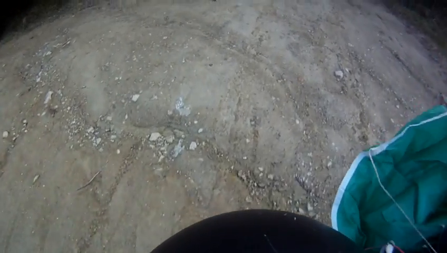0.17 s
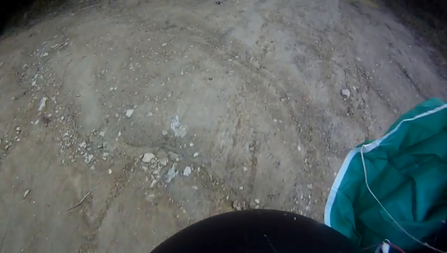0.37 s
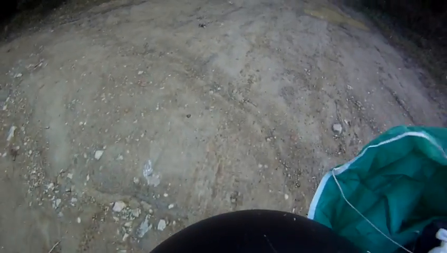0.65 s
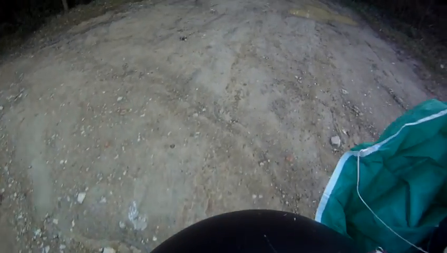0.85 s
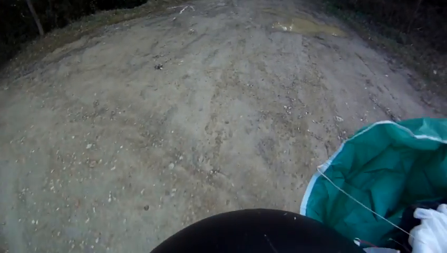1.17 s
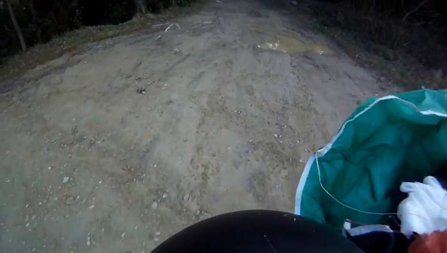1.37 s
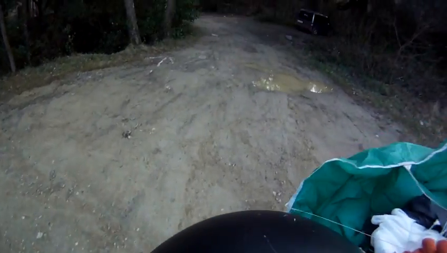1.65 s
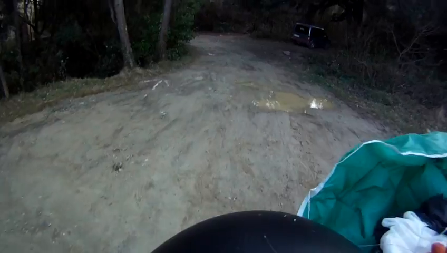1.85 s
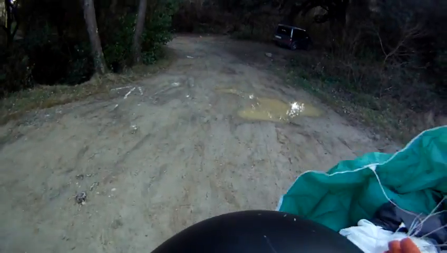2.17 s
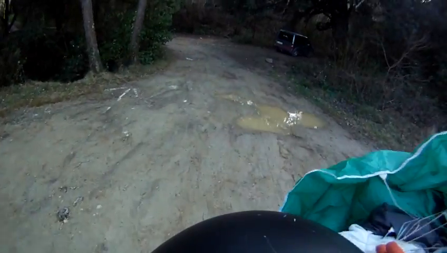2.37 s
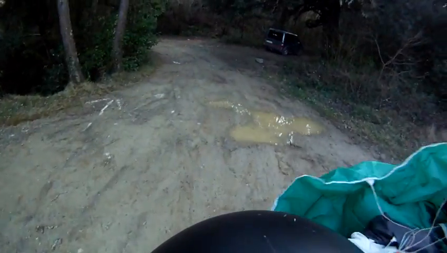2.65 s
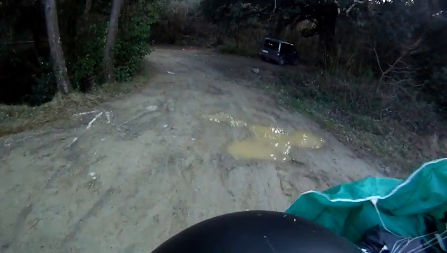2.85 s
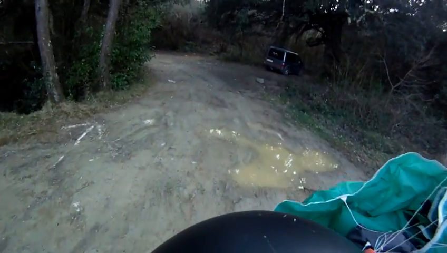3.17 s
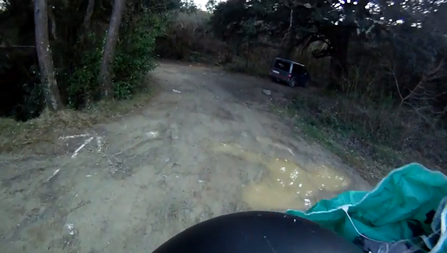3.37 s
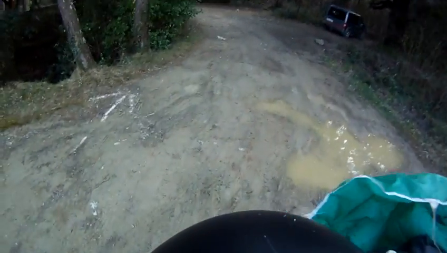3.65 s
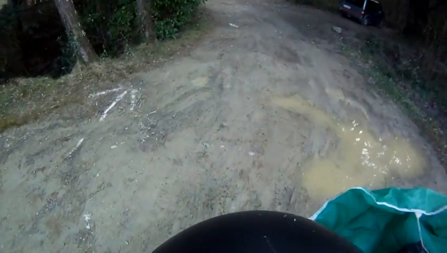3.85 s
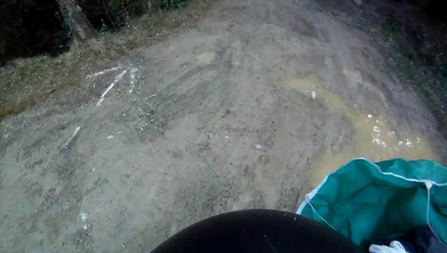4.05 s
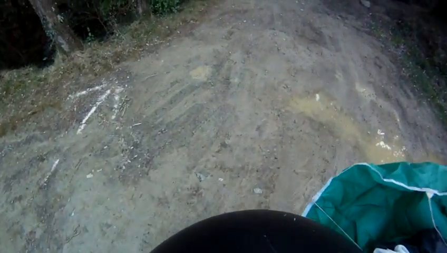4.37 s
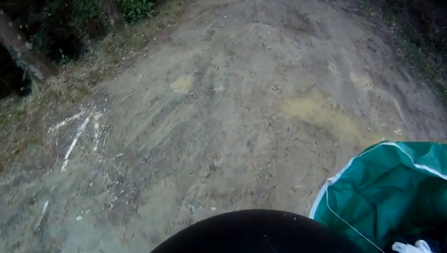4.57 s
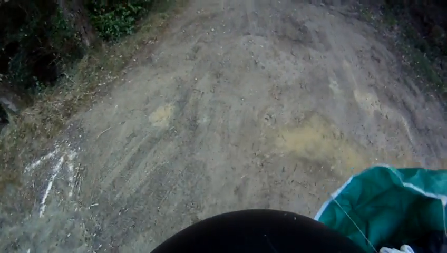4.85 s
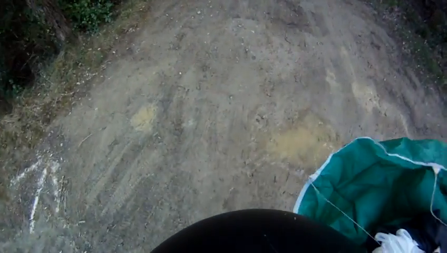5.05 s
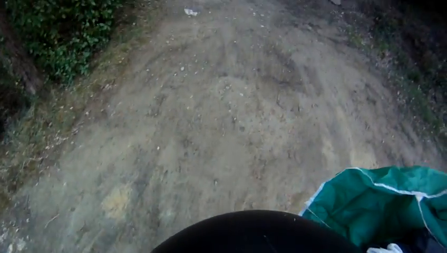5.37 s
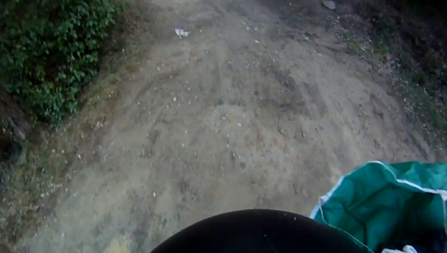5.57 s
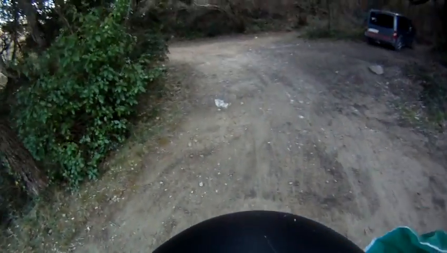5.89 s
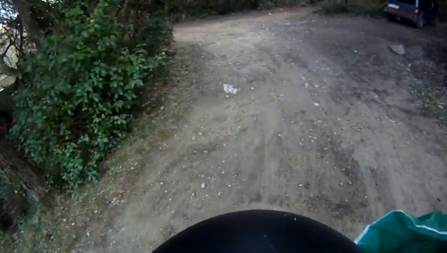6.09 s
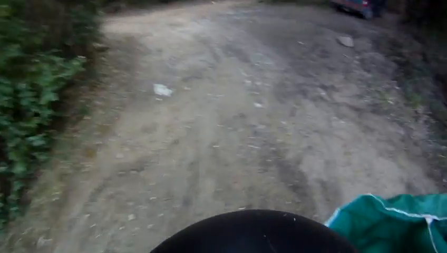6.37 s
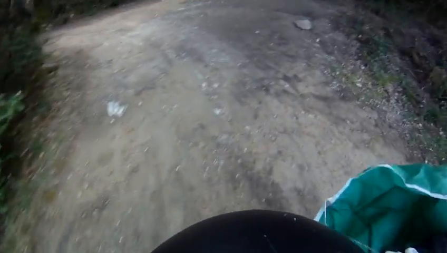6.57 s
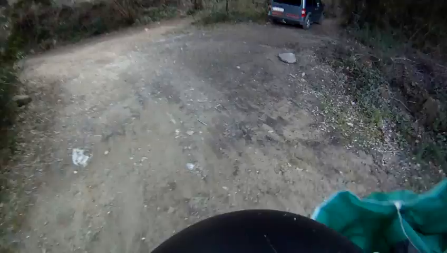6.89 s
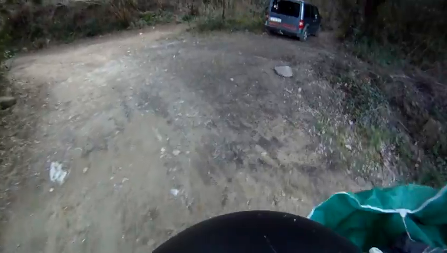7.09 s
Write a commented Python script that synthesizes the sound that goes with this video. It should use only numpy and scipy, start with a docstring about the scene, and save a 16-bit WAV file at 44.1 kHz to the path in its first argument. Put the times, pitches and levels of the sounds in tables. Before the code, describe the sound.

Sharp little plastic clicks and soft, deep bumps come in irregular clusters as a walker's helmet camera jolts in its mount. Short scrapes of fabric on the case fall among them, and a carried nylon bundle rustles quietly underneath throughout. Although the walk is on a dirt track, the microphone sits inside a closed housing, so the sound is close, muffled contact noise.

```python
"""A walker carries a bundled nylon wing along a gravel track, a sealed camera on the helmet.
From the start the bundle rustles faintly through the housing wall. At once the stride thuds through
the helmet, cloth scuffs the plastic housing and the loose mount ticks against it; all three recur
unevenly for seven seconds. Throughout, the camera holds each sample for 1/12000 s, which mirrors
the spectrum about 12 kHz."""
import sys
import numpy as np
from scipy import signal
from scipy.fft import rfft, irfft
from scipy.io import wavfile

SR = 44100
rng = np.random.default_rng(int(sys.argv[2]) if len(sys.argv) > 2 else 0)


def wrap_up_sound(samples):
    """Save the sound to the file named by the first command line argument, as 16-bit audio."""
    columns = np.atleast_2d(samples).T
    # keep every value between -1 and 1, then stretch to whole-number steps
    tamed = np.clip(columns, -1, 1)
    steps = np.round(tamed * 32767).astype(np.int16)
    wavfile.write(sys.argv[1], SR, steps)


N = 318402

# Impacts of the mount on the housing. Each row: start in seconds, relative level in dB,
# gain of the low modes in dB (the softer the contact, the more they speak).
MOUNT_IMPACTS = [(0.096, -16, -10.5), (0.171, -5, 3.5), (0.211, -30.5, 6.5), (0.551, -24, 13.5),
                 (0.619, -4.5, -8), (0.68, -25.5, -2), (0.865, -33, 3.5), (0.951, -19, -13),
                 (1.001, -35.5, 4.5), (1.047, -21.5, 4), (1.168, -3.5, -5), (1.328, -38, 19),
                 (1.477, -24.5, 4), (1.705, 1, -6.5), (1.811, -13, -1.5), (2.005, -44, 17.5),
                 (2.132, -46.5, 10.5), (2.409, -16, 2.5), (2.498, -11.5, -7), (2.61, -22.5, -3.5),
                 (2.695, -11, 0), (2.755, -43.5, 13.5), (2.944, -28.5, 7.5), (3.07, -4, -4.5),
                 (3.081, -14, 5.5), (3.153, -31.5, 6), (3.231, -47, 17.5), (3.345, -4.5, -2.5),
                 (3.414, -12.5, -2.5), (3.546, -5.5, -7.5), (3.555, 3, -11), (3.609, -33.5, 2),
                 (3.706, -7.5, -2), (3.838, -9.5, -5), (4.297, -14, 4), (4.404, -7.5, -18),
                 (4.837, -12.5, 2), (4.85, -6, 7.5), (4.984, -4.5, -6), (5.306, -24.5, -1),
                 (5.38, -19.5, -0.5), (5.784, -30, 5), (5.822, -11, 1), (5.862, -46, 18), (6.081, -5, -5),
                 (6.158, -7, -6), (6.171, -8.5, 0.5), (6.356, -9.5, -7.5), (6.447, -16, -5.5),
                 (6.466, -14.5, -10), (6.692, -30.5, 7), (6.801, -9, 9.5), (7.007, -18.5, 2.5),
                 (7.028, -19.5, 6)]


def from_db(db):
    """Amplitude ratio of a level in decibels."""
    return 10 ** (np.asarray(db) / 20)


def rms_one(x):
    """Normalisation to an rms of 1."""
    return x / np.sqrt(np.mean(x ** 2) + 1e-20)


def butter(x, hz, kind, order=2):
    """Butterworth filter: a maximally flat passband."""
    return signal.sosfilt(signal.butter(order, hz, kind, fs=SR, output="sos"), x)


def ring(force, hz, t60):
    """Damped oscillator: a unit impulse starts a unit sine that falls 60 dB in t60 seconds."""
    decay = from_db(-60 / (t60 * SR))
    angle = 2 * np.pi * hz / SR
    return signal.lfilter([0, np.sin(angle)], [1, -2 * decay * np.cos(angle), decay ** 2], force + 1e-18)


def coloured(x, spectrum):
    """Zero-phase filter: (Hz, dB) points are joined along a logarithmic frequency axis."""
    hz, db = np.transpose(spectrum)
    bin_hz = np.arange(N // 2 + 1) * SR / N + 1
    return irfft(rfft(x) * from_db(np.interp(np.log(bin_hz), np.log(hz), db)), N)


def cloth_rustle(size_db=6.5, crease_db=-9.0):
    """Buckling: creases flip at random over a smooth hiss, more often the more the cloth moves."""
    # Motion of the bundle. Each row: time in seconds, rustle level from 2.5 to 5.5 kHz in dB.
    bundle_motion = [(0, -64.5), (0.401, -68), (1.4, -65), (1.56, -62.5), (1.7, -67), (1.95, -64),
                     (2.099, -59.5), (2.25, -69), (2.45, -60.5), (2.7, -65.5), (4.1, -67), (5.599, -67.5),
                     (5.952, -60.5), (6.1, -66.5), (6.3, -63.5), (6.45, -65.5), (7.22, -66.5)]
    # Rustle through the housing wall. Each row: frequency in Hz, relative spectral level in dB.
    wall_spectrum = [(60, 14.5), (200, -6), (700, -9), (1600, -15), (2100, -7.5), (2700, -15), (3500, -13),
                     (4400, -21), (5100, -16), (5700, -20.5), (6000, -20.5)]
    level_db = np.interp(np.arange(N) / SR, *np.transpose(bundle_motion))
    motion_db = level_db - level_db.mean()
    creases_per_s = 120 * from_db(motion_db)
    sizes = from_db(size_db * np.minimum(rng.exponential(1, N), 4)) * rng.choice([-1, 1], N)
    flips = sizes * (rng.random(N) < creases_per_s / SR)
    creases = from_db(crease_db + 1.1 * motion_db) * rms_one(butter(flips, 3200.0, "high"))
    cloth = coloured(creases + rng.standard_normal(N), wall_spectrum)
    return from_db(level_db) * cloth / np.std(butter(cloth, [2500, 5500], "band"))


def helmet_jolts(cap_db=-13, tail_db=-13, evenness=0.51):
    """Resonance: the helmet rocks and thuds as two bands of steadied noise swell and fade at each jolt."""
    # Jolts of the stride. Each row: peak time in seconds, rocking level in dB, thud level in dB.
    stride = [(0.042, -25, -60), (0.103, -13, -30.5), (0.176, -13, -14), (0.232, -15.5, -51),
              (0.555, -13, -20.5), (0.624, -34, -28.5), (0.843, -21.5, -22.5), (1.005, -26.5, -24),
              (1.062, -29, -23), (1.113, -18.5, -38), (1.364, -36, -17.5), (1.488, -32, -31),
              (1.582, -24.5, -36), (1.726, -38, -34), (1.966, -26.5, -54), (2.016, -28, -33.5),
              (2.278, -35, -36.5), (2.402, -33, -57), (2.658, -38, -46), (2.704, -35.5, -32.5),
              (2.848, -34, -51), (2.956, -24, -27.5), (3.088, -18, -23), (3.346, -25.5, -57),
              (3.423, -29, -37), (3.593, -23, -41), (3.646, -32, -23), (3.825, -22.5, -30),
              (3.913, -33, -28), (4.089, -46, -65), (4.309, -27, -21), (4.472, -29.5, -60.5),
              (4.657, -21, -20), (4.791, -18, -45), (4.852, -17.5, -13), (4.91, -18.5, -33.5),
              (5.321, -21, -29), (5.386, -28.5, -29), (5.513, -44.5, -37.5), (5.679, -26.5, -22),
              (5.8, -27.5, -33.5), (5.886, -31.5, -33.5), (6.185, -17, -15.5), (6.375, -27.5, -31.5),
              (6.509, -25.5, -57), (6.614, -23, -22), (6.743, -20, -45.5), (6.811, -14, -24.5),
              (6.911, -55, -28), (7.041, -18.5, -27), (7.206, -27, -59)]
    # Helmet modes, rocking then thud. Each row: frequency in Hz, bandwidth in Hz,
    # swell time in seconds, fade time in seconds, resting level in dB.
    helmet_modes = [(44.7, 23, 0.0086, 0.02, -48), (139.1, 45, 0.008, 0.012, -60.5)]
    stride_s, rock_db, thud_db = np.transpose(stride)
    # Each tick of the mount also nudges both modes.
    tick_s, tick_db, low_db = np.transpose(MOUNT_IMPACTS)
    peak_s = np.append(stride_s, tick_s + .004)
    rock_db = np.append(rock_db, tick_db + low_db - 28)
    thud_db = np.append(thud_db, tick_db + low_db - 29)
    t = np.arange(-SR // 2, SR // 2 + 1) / SR
    out = np.zeros(N)
    for db, (hz, width_hz, swell_s, fade_s, rest_db) in zip([rock_db, thud_db], helmet_modes):
        swing = ring(rng.standard_normal(N + SR), hz, t60=np.log(1000) / np.pi / width_hz)
        swing = butter(swing, hz * 1.28, "low")
        swing = butter(swing, hz * .45, "high")[SR:]
        swing /= np.abs(signal.hilbert(swing)) ** evenness   # steadies the level of the noise
        pulse = np.exp(np.where(t < 0, -(t / swell_s) ** 2 / 2, -t / fade_s))
        tail = from_db(tail_db) * (t > 0) * np.exp(-np.abs(t) / (3.1 * fade_s))
        peaks = np.zeros(N)
        np.add.at(peaks, (peak_s * SR).astype(int), from_db(np.minimum(db, cap_db)))
        envelope = signal.fftconvolve(peaks, np.maximum(pulse, tail), "same") + from_db(rest_db)
        out += envelope * rms_one(swing)
    return butter(out, 198.0, "low")


def strike_housing(at, db, low_db, high_db, knock_db, spread_db):
    """Modal superposition: contacts at samples `at` ring each mode with random strength and sign."""
    # Modes of the plastic housing. Each row: frequency in Hz, relative level in dB,
    # time to decay by 60 dB in seconds.
    housing_modes = [(444, -14, 0.047), (696, -13, 0.053), (799, -10, 0.038), (986, -1.5, 0.011),
                     (1254.4, -9.5, 0.031), (1544, -15, 0.028), (1830, -21, .025), (2043, -4.5, 0.031),
                     (2209, -14.5, 0.037), (2942, -10, 0.021), (3215, -2, 0.013), (3620, -14.5, 0.021),
                     (3940, -18.5, 0.023), (4560, -25, 0.015)]
    chance = rng.standard_normal((len(at), len(housing_modes), 2))
    out = np.zeros(N)
    for k, (hz, mode_db, t60) in enumerate(housing_modes):
        colour_db = low_db * (hz < 1400) + high_db * (hz > 2500) + knock_db * (1700 < hz < 1900)
        strength = from_db(db + colour_db + mode_db + spread_db * chance[:, k, 0])
        impulses = np.zeros(N)
        np.add.at(impulses, at, strength * np.sign(chance[:, k, 1]))
        out += ring(impulses, hz, t60)
    return butter(out, 4760.0, "low", order=4)   # plastic contacts are never quite sharp


def cloth_scuffs(slips=22, half_length_s=0.023, level_db=-11.5, edge_db=-11.5):
    """Stick-slip friction: a scuff is a swarm of small slips, densest and strongest in its middle."""
    # Rubs of cloth and strap on the housing. Each row: midpoint in seconds, relative level in dB.
    rubs = [(.072, -50), (.115, -41), (0.169, -24), (.54, -36.5), (.589, -41), (.70, -42), (0.831, -32),
            (1.055, -33), (1.085, -37), (1.355, -29), (1.415, -45.5), (1.495, -41.5), (1.572, -41.5),
            (1.713, -25), (2.072, -46), (2.216, -50.5), (2.277, -45.5), (2.93, -46), (2.994, -36),
            (3.461, -43.5), (3.642, -33), (3.765, -43), (3.817, -26), (3.907, -35), (4.294, -41),
            (4.448, -42), (4.65, -32.5), (4.691, -41), (4.8, -31), (4.889, -34), (5.477, -43), (5.671, -30),
            (5.707, -44.5), (5.884, -46.5), (5.948, -36), (6.196, -38.5), (6.216, -64), (6.238, -39),
            (6.287, -50), (6.352, -49), (6.611, -30), (6.654, -51), (6.754, -46.5), (6.798, -32),
            (6.838, -37.5), (6.873, -42.5), (6.907, -44)]
    middle_s, rub_db = np.repeat(rubs, slips, axis=0).T
    place = rng.triangular(-1, 0, 1, len(middle_s))
    uneven_db = 3.35 * np.minimum(rng.exponential(1, len(middle_s)), 2.8)
    slip_db = rub_db + level_db + edge_db * np.abs(place) + uneven_db
    at = ((middle_s + half_length_s * place) * SR).astype(int)
    return strike_housing(at, slip_db, low_db=2.5, high_db=-10.0, knock_db=2.0, spread_db=4.5)


def mount_ticks(contacts=5, rattle_s=0.004013, fade_db=15.0, level_db=-5.5):
    """Contact chatter: a light touch, the full impact, then weaker ones, drawn out in soft ticks."""
    start_s, tick_db, low_db = np.repeat(MOUNT_IMPACTS, contacts, axis=0).T
    progress = np.tile(np.arange(contacts) / contacts, len(MOUNT_IMPACTS))
    jitter = (progress > 0) * rng.uniform(-0.11, 0.061, len(start_s))
    stretch = from_db(.35 * np.maximum(low_db, 0))
    delay_s = rattle_s * stretch * (progress + jitter)
    at = ((start_s + delay_s) * SR).round().astype(int)
    contact_db = tick_db + level_db - fade_db * progress - 5.4 * (progress == 0)
    high_db = -1.5 + 0.85 * tick_db   # louder ticks are brighter
    return strike_housing(at, contact_db, low_db, high_db, knock_db=7, spread_db=5.0)


def scene():
    """Superposition: all sources add at one microphone inside the housing, sent to both channels."""
    mono = mount_ticks() + cloth_scuffs() + helmet_jolts() + cloth_rustle()
    return np.array([mono, mono])


def record(dry, hold_hz=12000, cutoff_hz=16600):
    """Zero-order hold: the spectrum is mirrored about the hold rate under a sinc slope; the top is cut."""
    # The camera's treble roll-off. Each row: frequency in Hz, gain in dB.
    roll_off = [(15250, 0), (15500, -22), (16500, -30)]
    hiss = from_db(-75.0) * butter(rng.standard_normal(N), 150.0, "high")
    # Peaks are rounded; the circuit hiss has opposite sign in the two channels.
    analogue = np.tanh(dry) + hiss * [[1], [-1]]
    band_limited = signal.sosfilt(signal.cheby2(8, 14, hold_hz / 2, fs=SR, output="sos"), analogue)
    mirrored = band_limited * (1 + 2 * np.cos(2 * np.pi * hold_hz * np.arange(N) / SR))
    bin_hz = np.arange(N // 2 + 1) * SR / N
    held = irfft(rfft(mirrored) * np.sinc(bin_hz / hold_hz), N)
    softened = coloured(held, roll_off)
    return signal.sosfilt(signal.cheby2(12, 70, cutoff_hz, fs=SR, output="sos"), softened)


dry = scene()
out = record(dry)
wrap_up_sound(out)
```